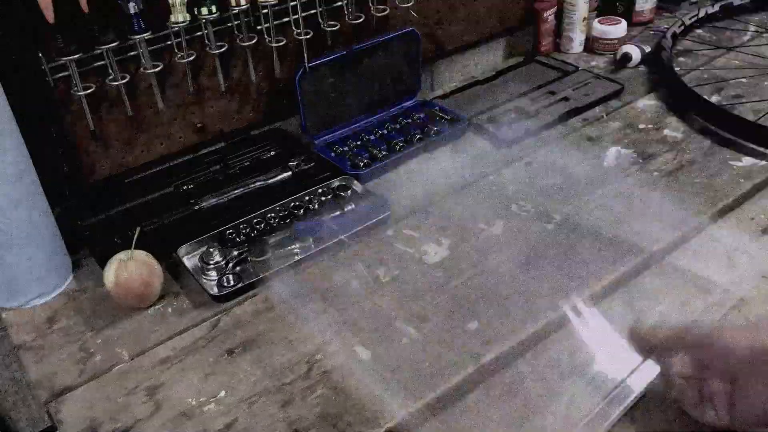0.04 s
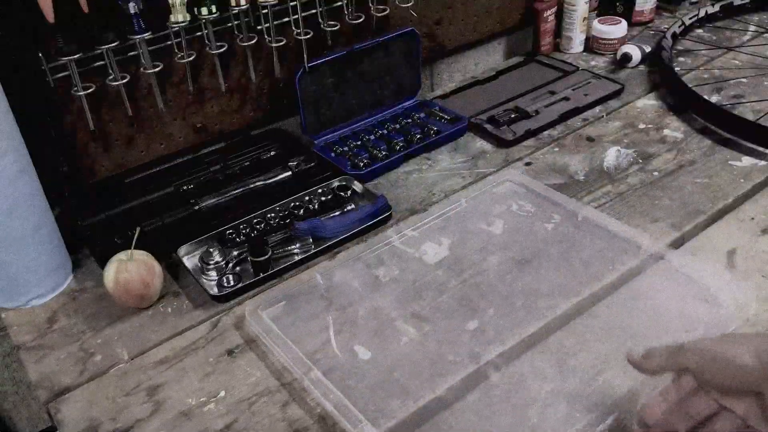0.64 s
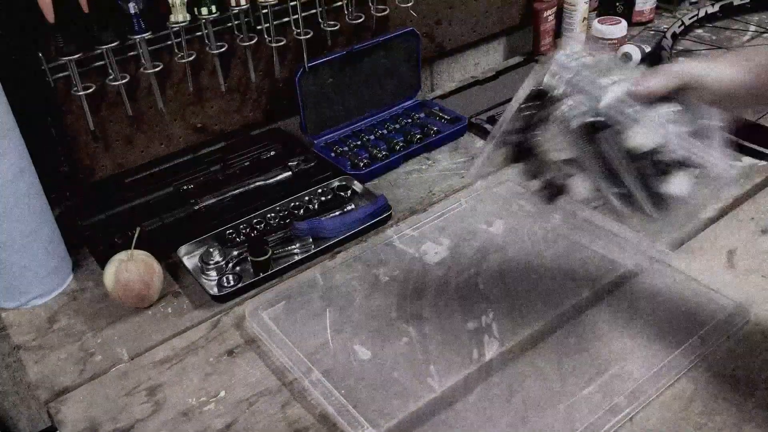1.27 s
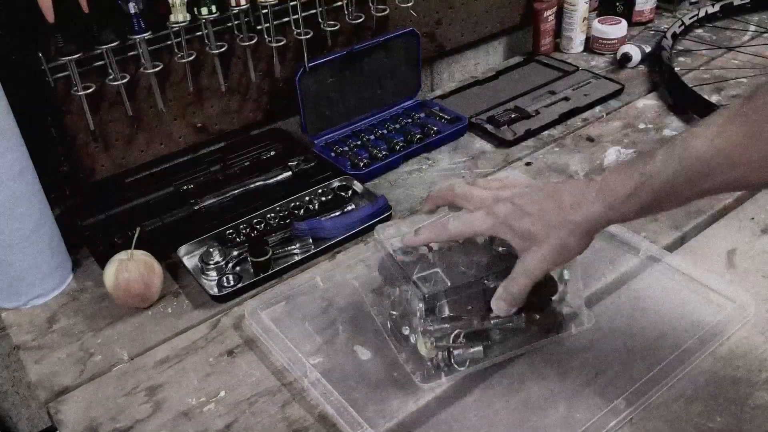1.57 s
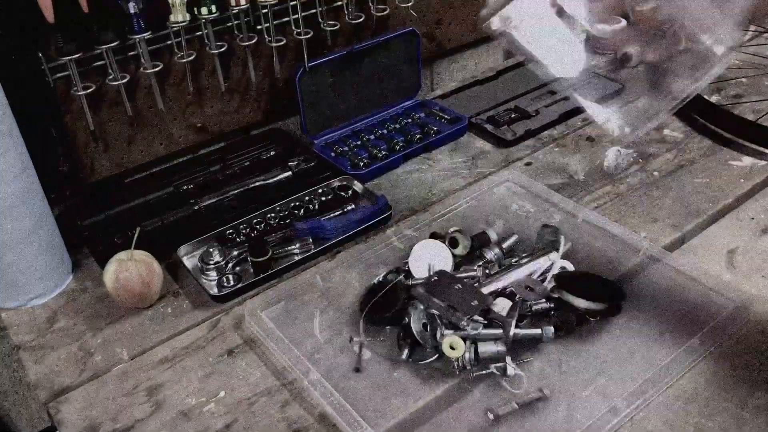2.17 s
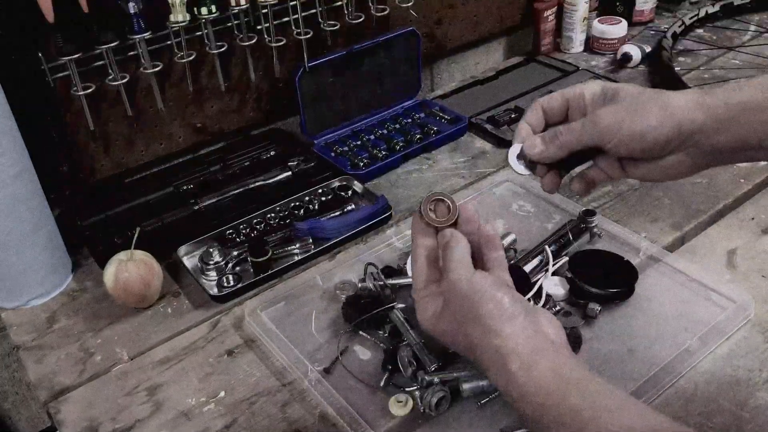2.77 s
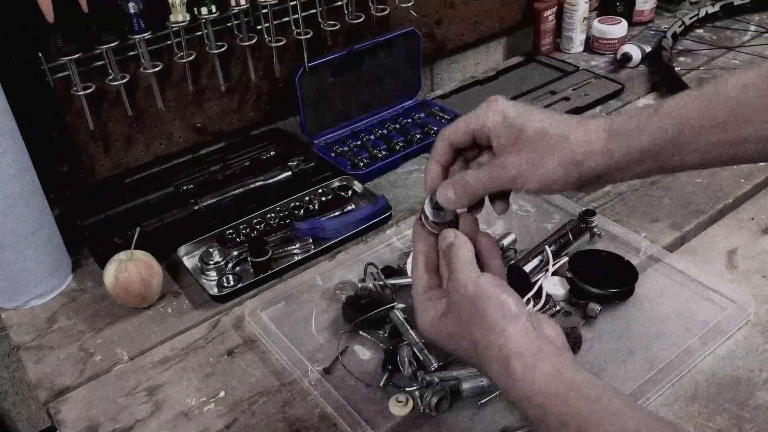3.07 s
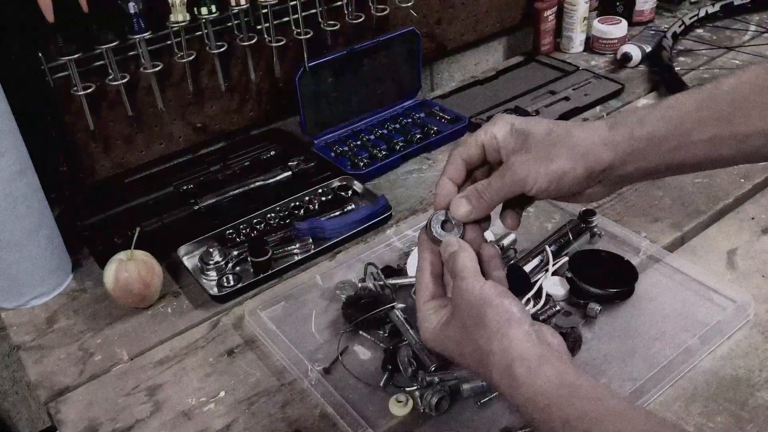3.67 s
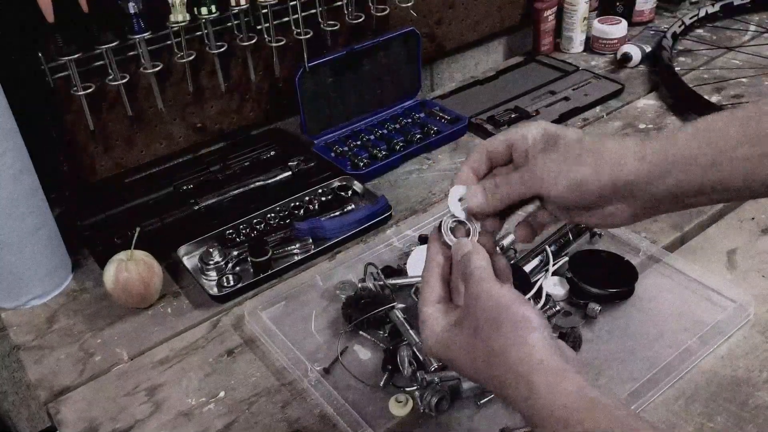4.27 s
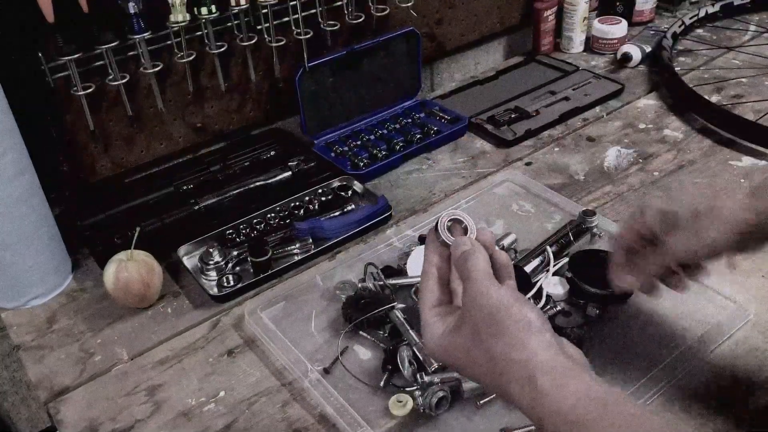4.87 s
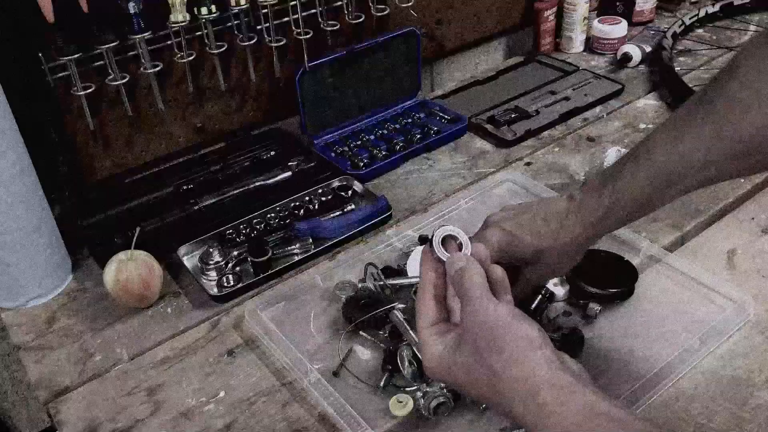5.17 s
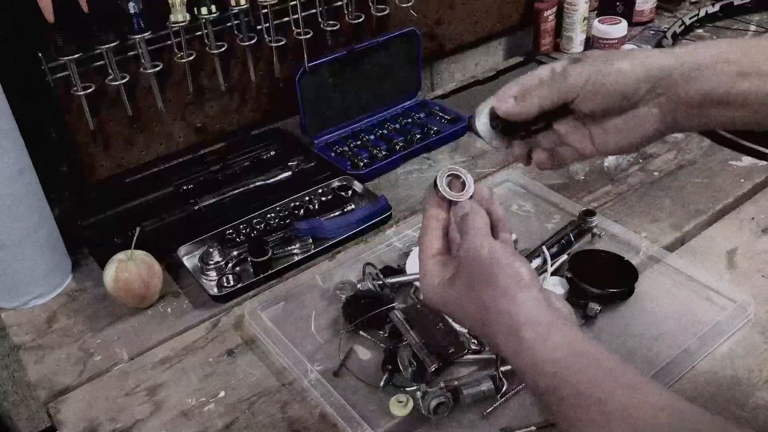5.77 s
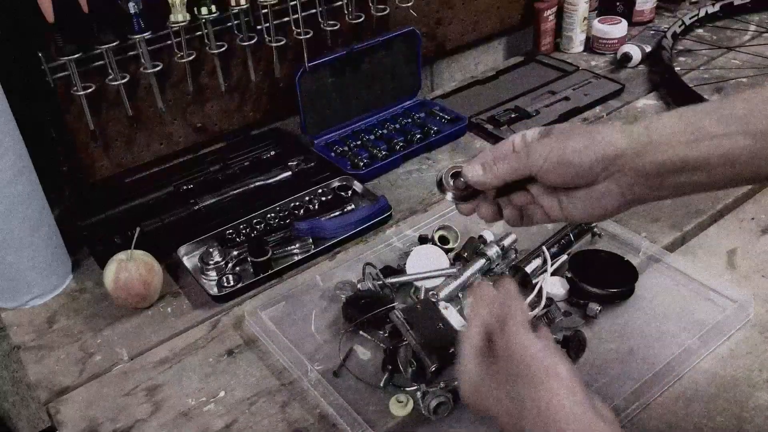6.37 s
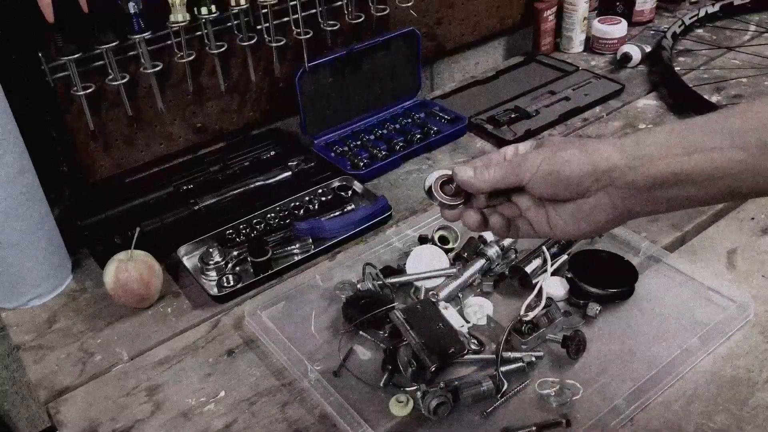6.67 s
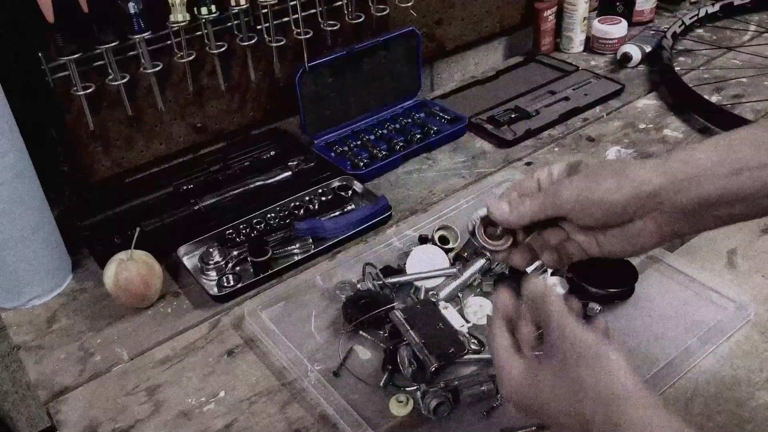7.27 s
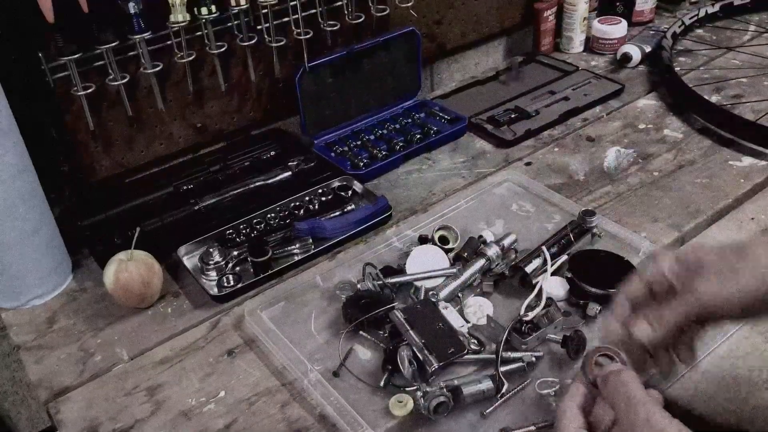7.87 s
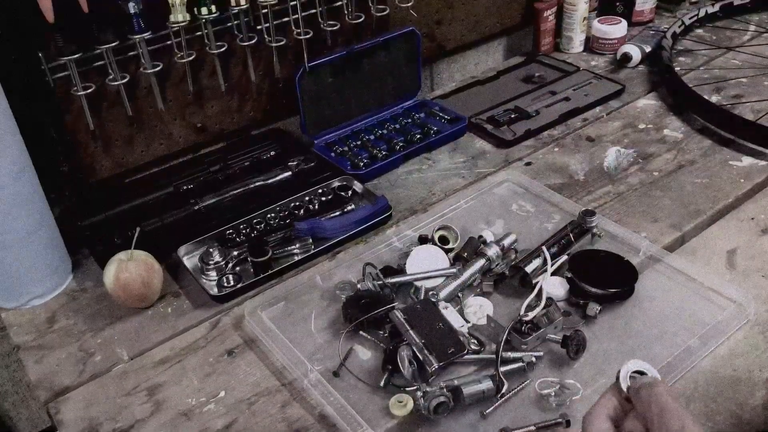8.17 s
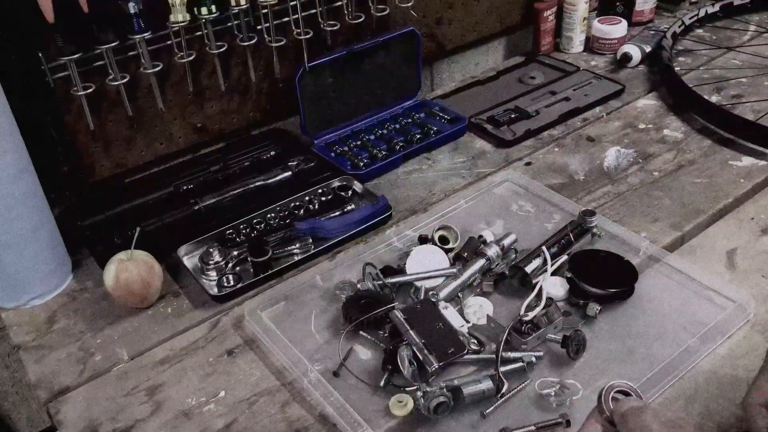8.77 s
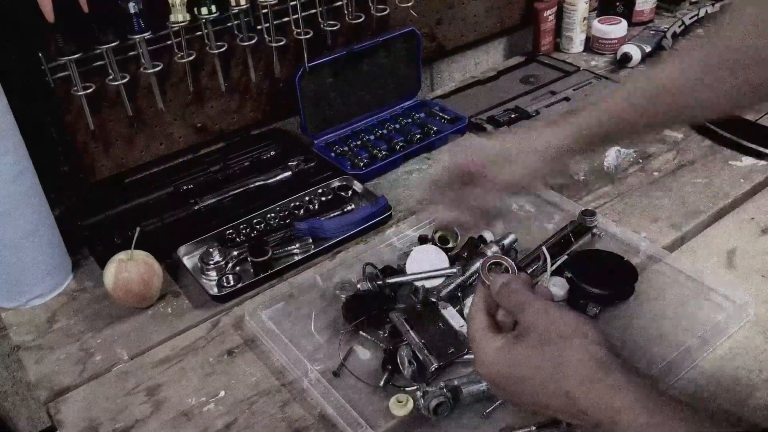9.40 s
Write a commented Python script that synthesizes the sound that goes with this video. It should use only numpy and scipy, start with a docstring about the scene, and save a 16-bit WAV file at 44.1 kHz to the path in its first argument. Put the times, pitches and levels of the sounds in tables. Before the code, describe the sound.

A plastic lid slaps onto a wooden workbench. A box of small metal parts rattles, bangs down hard, and spills its load, which drums and jingles on the plastic. After a pause, hands rummage through the heap with light clinks and scrapes. A washer drops with a sharp clack and rolls away with a faint wobble. The sounds are close, in a small workshop with a short echo and a low hum.

```python
"""A small workshop with a low hum; the room answers every knock.
A plastic lid is slapped onto a wooden bench; a box of small metal parts is banged upside down on it
and lifted off. The parts pour out, drumming on the plastic and clinking in their own modes.
Hands pick washers from the heap, try them together and drop one, which rolls away wobbling."""
import sys
import numpy as np
from scipy import signal
from scipy.fft import rfft
from scipy.io import wavfile

SR = 44100
rng = np.random.default_rng(int(sys.argv[2]) if len(sys.argv) > 2 else 0)


def to_wav(sig):
    """Store sig (one row per channel, or 1-D mono) as 16-bit WAV at the path in sys.argv[1].

    Samples outside -1..1 are clipped; the rate is SR.
    """
    pcm = np.clip(np.atleast_2d(sig), -1, 1) * 32767
    pcm = np.round(pcm).astype(np.int16)
    wavfile.write(sys.argv[1], SR, pcm.T)  # frames by channels


N = 416304
TIME = np.arange(N) / SR
TAPS, EDGE_HZ = 8192, 16200
PICKUP_S, LAND_S, LIFT_S, POUR_END_S = 1.02, 1.425, 1.945, 2.59

BANDS_HZ = [(150, 1200), (1200, 5000), (5000, 16000)]  # thud, clack, tick: low/Hz, high/Hz
# plastic resonances: f/Hz, width/Hz, level/dB
LANDED_BOX = [(287, 15, -11), (480, 7.7, -3.5), (607, 260, -5), (895.6, 84.8, -5.5), (1200, 56, -12),
              (1710, 73, -4), (2211, 220, -11.5)]
LOADED_LID = [(400, 31, -16.5), (689, 61, -8), (1715, 110, 1.5), (2890, 30, -10), (3490, 54.16, -9),
              (3870, 33, -8), (4752, 126, -7)]
# spectra: f/Hz, level/dB
BOX_TONE = [(35, -45.5), (60, -17), (130, -13), (250, -6.5), (281, -7.5), (315, -8.5), (448, -4), (515, -3),
            (651, -1), (1440, -10.5), (1620, -9.5), (3120, -10), (5330, -19.5), (13900, -24.5),
            (16000, -32.5)]
HEAP_TONE = [(59, -17), (100, -12.5), (277, -14), (335, -15.5), (433, -10), (991, -10.5), (1680, -0.5),
             (2990, 2), (5420, -10), (8830, -13), (10500, -16.5), (12700, -15), (16000, -22)]
RUB_TONE = [(88, -2), (150, -25), (359, -23), (443, -23.5), (623, -6), (1740, -9), (3440, -9.5),
            (6070, -17.5), (14000, -38)]


def amp(db):
    """dB to gain."""
    return 10 ** (np.asarray(db) / 20)


def unit(x):
    """Scale to rms 1."""
    return x / np.sqrt(np.mean(x ** 2) + 1e-20)


def read(points, hz):
    """Interpolate over log frequency."""
    f, value = np.transpose(points)
    return np.interp(np.log(hz + 1), np.log(f + 1), value)


def add(mix, start_s, sound):
    """Mix in place."""
    part = mix[max(round(start_s * SR), 0):][:len(sound)]
    part += sound[:len(part)]


def band(x, low_hz, high_hz):
    """Butterworth band-pass."""
    return signal.sosfilt(signal.butter(4, [low_hz, high_hz], "band", fs=SR, output="sos"), x)


def colour(x, tone):
    """Minimum-phase filter: attacks stay sharp."""
    hz = abs(np.fft.fftfreq(TAPS, 1 / SR))
    log_gain = np.log(amp(np.maximum(read(tone, hz), -100)))
    response = np.fft.ifft(np.exp(np.conj(signal.hilbert(log_gain)))).real
    return signal.oaconvolve(x, response[:TAPS // 2])[:len(x)]


def resonate(x, modes):
    """Parallel resonators."""
    return sum(amp(db) * signal.lfilter(*signal.iirpeak(hz, hz / width_hz, SR), x)
               for hz, width_hz, db in modes)


def ring(modes, size=SR):
    """Sum of decaying sines."""
    t = np.arange(size) / SR
    return sum(amp(db - 60 * t / t60_s) * np.sin(2 * np.pi * hz * t) for hz, db, t60_s in modes)


def grains(per_s, spread_db):
    """Random impulses, most weak, a few strong."""
    size = amp(spread_db * np.minimum(rng.exponential(1, N), 4))
    return size * rng.choice([-1, 1], N) * (rng.random(N) < per_s / SR)


def air():
    """Faint steady noise, mostly bass."""
    tone = [(12, -29.5), (20, -1), (39, -1), (75, -17), (96, -3.5), (120, -8), (157, -9.5), (185, -20),
            (326, -28.5), (464, -20), (561, -29), (755, -30), (1530, -39.5), (10200, -46.5), (13000, -51)]  # spectrum: f/Hz, level/dB
    noise = band(colour(rng.standard_normal(N), tone), 10, 13500)
    return amp(-77) * noise / band(noise, 200, 13000).std()


def hum():
    """Low wavering hum; its pitch and level step."""
    steps = [(0, 60.1, -60.5), (1.011, 98.84, -67.5), (2.6, 122.1, -67), (9.019, 115, -71.5)]  # t/s, f/Hz, level/dB
    start_s, hz, db = np.transpose(steps)
    step = np.searchsorted(start_s[1:], TIME)
    lowpass = signal.butter(2, 14, fs=SR, output="sos")
    waver = unit(signal.sosfilt(lowpass, rng.standard_normal((2, N))))
    carrier = np.exp(2j * np.pi * np.cumsum(hz[step]) / SR)
    return amp(db - 1)[step] * (carrier * (waver[0] + 1j * waver[1])).real


def workshop(x, onset_s):
    """Diffuse echo of a small room; treble dies first."""
    decay = [(150, .42), (400, 0.33), (1040, 0.31), (2760, 0.28), (7280, 0.18), (15000, 0.25)]  # f/Hz, t60/s
    hz, t, spectrum = signal.stft(rng.standard_normal(SR // 2), SR, nperseg=256)
    spectrum *= amp(-60 * t / read(decay, hz)[:, None])
    tail = signal.istft(spectrum, SR, nperseg=256)[1]
    tail *= 1 - np.exp(-(np.arange(len(tail)) / SR / onset_s) ** 2)
    tone = [(100, 2.5), (700, 0.5), (2500, -3), (7000, -4.5), (15000, -3.5)]  # f/Hz, level/dB
    tail = colour(tail / np.linalg.norm(tail), tone)
    return signal.oaconvolve(x, tail)[:N]


def rolling_washer():
    """A washer rolls, swishing at each wobble, faster as it leans over; things on the bench ring."""
    path = [(8.03, -70, 16), (8.3, -73, 14.4), (8.6, -74, 20), (8.8, -74, 23.9), (8.99, -71, 30)]  # t/s, level/dB, wobble rate/Hz
    # two low tones ringing from things on the bench, two for the swish: f/Hz, width/Hz, level/dB
    modes = [(734.5, 35, 3), (1106, 46, -4), (2810, 150, -1), (5140, 970, -19)]
    s, db, wobble_hz = np.transpose(path)
    turns = np.cumsum(np.interp(TIME, s, wobble_hz) * (TIME > s[0])) / SR
    wobble = np.cos(np.pi * turns) ** 2
    bench_ring = unit(resonate(rng.standard_normal(N), modes[:2]))
    swish = resonate(rng.standard_normal(N), modes[2:])
    swish = unit(swish + amp(-1) * colour(rng.standard_normal(N), RUB_TONE))
    gain = amp(np.interp(TIME, s, db)) * (TIME >= s[0]) * (TIME <= s[-1])
    return gain * (bench_ring * (0.5 + 0.32 * wobble) + amp(-5) * swish * wobble ** 2)


def rubs(attack_s=0.0058, t60_s=0.18):
    """Fingers and parts slide: strokes of tiny crackling slips."""
    strokes = [(0.093, .007, -56.5), (0.272, 0.16, -71), (0.447, .025, -66), (0.5, 0.012, -64.5),
               (3.729, .1, -83), (4.735, 0.22, -62), (5.002, .008, -63), (5.235, 0.028, -60),
               (5.294, 0.018, -61), (8.594, 0.014, -72.5), (9.075, .02, -74.5), (9.135, 0.028, -72),
               (9.3, 0.078, -81.5)]  # t/s, length/s, level/dB
    slips = unit(colour(grains(per_s=5800, spread_db=0.5), RUB_TONE))
    pressure, t = np.zeros(N), np.arange(SR) / SR
    for s, length_s, db in strokes:
        release_db = -60 * np.maximum(t - length_s, 0) / t60_s
        add(pressure, s, amp(db + release_db) * np.minimum(t / attack_s, 1))
    return amp(3.5) * slips * pressure


def ringing():
    """Free parts chime; the two big blows shake the bench and what lies on it."""
    strikes = [(1.089, -44.5, "box"), (1.201, -50.5, "box"), (1.225, -49, "box"), (2.122, -27.5, "sleeve"),
               (2.174, -28, "sleeve"), (2.263, -23.5, "sleeve"), (5.196, -47, "nut"), (5.224, -48, "bolt"),
               (5.234, -39.5, "bolt"), (5.353, -71, "tool case"), (5.375, -23.5, "bush"),
               (5.896, -27.5, "washer"), (7.44, -51, "washer"), (7.828, -34.5, "ring"),
               (7.902, -59, "tool case")]  # t/s, level/dB, part
    # modes: f/Hz, level/dB, t60/s
    part_modes = {"box": [(711, -4, .12), (920, 1.5, 0.11), (1120, -7, .1), (1370, -8.5, .1)],
                  "sleeve": [(7520, -0.5, 0.096), (8710, 1, .1), (12889, -7.5, 0.12), (12960, -3.5, .11)],
                  "nut": [(7770, 7.5, 0.059), (12400, -19, .06)], "bolt": [(4160, 0, 0.068),
                  (4340, 4, 0.045), (4700, 0, .08), (4823, -7, 0.088), (8000, -10.5, .1), (13100, -17, .1),
                  (15500, -5, 0.084)], "bush": [(5100, -25, 0.093), (8690, -2, 0.083),
                  (13700, -26.5, 0.11)], "washer": [(8650, -14.5, 0.077), (11930, -7, 0.019),
                  (13500, -19, .11), (13600, -6, 0.04)], "ring": [(8900, -14, 0.36), (13960, 0.5, .46)],
                  "tool case": [(1130, -1, 1.1), (1750, -11.5, .9), (2473, -18.5, 1.1)]}
    clutter_modes = [(70.15, 5, 0.25), (307, -13, 1.2), (608, -4, 1.6), (660, -4, 0.77), (760, -11, 3.1),
                     (824, -4.5, 1.2)]
    bench_modes = [(44.5, -7, 0.82), (174, -0.5, 0.29), (224, 1, .25), (283, -5, 0.12), (458.3, 7.5, 0.14),
                   (534, -8.5, 1.7), (560, 6, .2), (656, 11.5, .18), (893.5, 10, .2), (932, 7.5, 0.18)]
    out = np.zeros(N)
    for s, db, part in strikes:
        add(out, s, amp(db) * ring(part_modes[part]))
    add(out, 0.127, amp(-48) * ring(clutter_modes))
    add(out, 1.448, amp(-31) * ring(bench_modes))
    return out


def loose_part(t60_s, detune):
    """One metal part: three modes of the heap, randomly detuned and damped."""
    heap_modes = [(5787, -64), (6169, -64), (6756, -59), (7370, -53.5), (7671, -50), (7854, -59),
                  (8290, -59), (8710, -46.5), (9017, -58), (9458, -59.5), (9932, -58), (9991, -56),
                  (11100, -50.5), (12252, -54), (12888, -51.5), (13173, -48), (13631, -62), (14067, -63.5),
                  (15455, -57.5), (15558, -61)]  # f/Hz, level/dB
    picks = rng.permutation(heap_modes)[:3]
    modes = [(hz * (1 + detune * rng.standard_normal()), db, t60_s * np.exp(rng.normal(0, 0.092)))
             for hz, db in picks]
    sound = ring(modes, size=TAPS // 2)
    return np.pad(sound, (0, TAPS // 2)) / abs(sound).max()


def plastic_body(x, modes, loss_hz=70):
    """Thin lossy plastic: widened resonances, capped at 0 dB, add a hollow colour."""
    return x + resonate(x, [(hz, width_hz + loss_hz, min(db, 0)) for hz, width_hz, db in modes])


def blows(hits, tone, modes, snap_db, crack_s, body_db, body_t60_s, metal_db, echo_db):
    """Each blow: a snap with near echoes, a brief crack, dense plastic ring, a metal part's modes."""
    echoes = [(.0012, -5), (.0028, -4), (.0047, -6)]  # off bench and tool cases: delay/s, level/dB
    out, t, hz = np.zeros(N), np.arange(TAPS) / SR, np.fft.rfftfreq(TAPS, 1 / SR)
    envelope = np.exp(-t / crack_s) + amp(body_db - 60 * t / body_t60_s)
    attack = round(0.02 * SR)
    for s, clack_db, thud_db, tick_db in hits:
        hit = envelope * rng.standard_normal(TAPS)
        hit += amp(metal_db) * loose_part(t60_s=0.029, detune=0.013)
        hit[0] += amp(snap_db)
        for delay_s, db in echoes:
            add(hit, delay_s * rng.uniform(0.93, 1.15), amp([snap_db + echo_db + db]))
        hit = colour(plastic_body(hit, modes), tone)
        # force and point of impact set the band balance
        power = 2 * abs(rfft(hit[:attack], TAPS)) ** 2 / (TAPS * attack)
        band_db = 10 * np.log10([power[(hz > low) & (hz < high)].sum() for low, high in BANDS_HZ])
        thud, clack, tick = np.array([thud_db, 0, tick_db]) - band_db
        balance = [(900, thud), (1600, clack), (3800, clack), (6800, tick)]
        add(out, s, amp(clack_db) * colour(hit, balance))
    return out


def washer_clicks():
    """Single washers click together or land near the lid's rim."""
    hits = [(3.095, -72.5, -14, -2), (3.117, -83, -8, 16), (4.792, -53, -27, -17), (4.817, -55, -29.5, -12),
            (4.858, -54, -28, -11.5), (5.149, -65, -13, -11), (5.375, -50.5, -6, -3),
            (5.896, -62, -12, 9.5), (6.465, -85.5, -1, 7), (7.437, -78.5, -9, 6.5), (7.722, -76.5, -6, 1),
            (7.823, -56, -4.5, 10.5), (7.901, -24.5, -13, 2), (7.946, -40, -15.5, 2.5),
            (8.004, -56, -6, -1), (8.138, -84, 13, 13)]  # t/s, clack/dB, thud/dB re clack, tick/dB re clack
    tone = [(59, -34), (100, -1.5), (202, -31.5), (277, -5), (350, -10), (736, -3), (880, -5), (1080, -4.5),
            (1750, -11), (2270, -10), (2470, -7), (3470, -6), (4770, 0), (8830, -1), (14100, -3.5),
            (16000, -11.5)]  # f/Hz, level/dB
    edge_modes = [(1044, 120, 1.5), (1432, 32, -4.5), (2025, 51, 1), (2550, 16, -9), (3600, 36, -8)]  # f/Hz, width/Hz, level/dB
    return blows(hits, tone, edge_modes, snap_db=19, crack_s=0.001586,
                 body_db=-4, body_t60_s=0.063, metal_db=-27, echo_db=-3)


def heap_clinks():
    """Metal parts knock on the heap and the loaded lid."""
    hits = [(1.951, -53.5, 9, -5.5), (1.988, -39, -14, -14), (2.027, -38.5, -8.5, -28),
            (2.068, -34.5, -4, 3), (2.112, -33.5, -8, -7), (2.122, -49, 5, 20), (2.173, -39, -1.5, 7),
            (2.264, -45, -4, 12), (2.351, -55.5, -12, 17), (2.388, -34, -13, -7.5),
            (2.54, -44.5, -13.5, -13), (2.569, -49, -15.5, -20), (4.621, -39, -5, -1),
            (4.666, -39.5, -7.5, -8.5), (4.682, -46, -7, -13), (4.717, -48, -7.5, -3),
            (5.011, -46, -8.5, -8), (5.174, -59.5, -2, -1), (5.183, -53, 0, -5), (5.196, -48.5, -4, -3),
            (5.224, -56, 0.5, 4.5), (5.305, -56.5, -15, -8), (5.342, -52, -14.5, -8),
            (5.353, -45, -7.5, 0.5), (5.363, -48.5, -4, -11)]  # t/s, clack/dB, thud/dB re clack, tick/dB re clack
    return blows(hits, HEAP_TONE, LOADED_LID, snap_db=8.5, crack_s=0.0013,
                 body_db=5, body_t60_s=0.099, metal_db=-13.5, echo_db=-5)


def lid_slaps():
    """Hollow knocks on the plastic lid, then a soft hand thump on the bench."""
    hits = [(0.084, -61.5, 18, -17), (0.12, -27.5, -7, -9.5), (0.127, -20, -8.5, -12.5),
            (0.153, -54, 1, -10), (0.201, -56, -5, -20), (0.211, -38.5, -6, -20), (0.716, -48, -3, -21),
            (0.724, -42, -5, -15), (0.775, -52.5, -6, -21), (7.847, -40, -10.5, -10.5),
            (7.852, -46.5, -7.5, -11.5), (9.157, -76.5, 11.5, -7), (9.23, -89.5, 15.5, -6.5)]  # t/s, clack/dB, thud/dB re clack, tick/dB re clack
    tone = [(18, -26), (30, -7.5), (124, -14.5), (252, -4.5), (404, -10.5), (473, -1), (1010, -4.5),
            (1400, -5.5), (2230, -4), (2680, -4.5), (4000, -7.5), (10500, -30.5), (16000, -47.5)]  # f/Hz, level/dB
    lid_modes = [(1020, 74, -10.5), (1334, 70, 0), (1497, 25, -1.5), (2030, 35, -11.5), (2237, 41, -4),
                 (2280, 33, -5), (3180, 140, -7.5), (4205, 35, -12), (5960, 69, -20.5)]  # f/Hz, width/Hz, level/dB
    return blows(hits, tone, lid_modes, snap_db=11, crack_s=0.0026,
                 body_db=-19.5, body_t60_s=0.11, metal_db=-56, echo_db=-3)


def box_bangs():
    """The full box and its load knock, hardest on landing."""
    hits = [(1.09, -58.5, 1.5, 2.5), (1.172, -63, -7, 5.5), (1.275, -46, -3.5, -9), (1.321, -50, -5, -9),
            (1.349, -47.5, -0.5, -4.5), (1.374, -46.5, 1, -2), (1.443, -22.5, 2.5, -20.5),
            (1.454, -21, 6, -10), (1.461, -14, -7, -13), (1.529, -38.5, 0, -5), (1.588, -34, -4, -13.5),
            (1.625, -33.5, -14, -14), (1.712, -46, -9.5, -21), (1.762, -43.5, -5.5, -14.5)]  # t/s, clack/dB, thud/dB re clack, tick/dB re clack
    return blows(hits, BOX_TONE, LANDED_BOX, snap_db=12.5, crack_s=0.0016,
                 body_db=-7.5, body_t60_s=0.14, metal_db=-20, echo_db=-3.5)


def contacts(per_s, spread_db, scrape_s=0.0015):
    """Parts hit plastic at random: each a click and a brief scrape."""
    clicks = unit(grains(per_s, spread_db))
    energy = signal.lfilter([1], [1, -np.exp(-1 / (scrape_s * SR))], clicks ** 2)
    scrape = unit(np.sqrt(energy) * rng.standard_normal(N))
    return unit(scrape + amp(-6.5) * clicks)


def jingle(t60_s, detune, count):
    """Parts hit each other at random, each with its own pitches."""
    out = np.zeros(N)
    for slot in range(count):
        s = np.interp(slot + rng.random(), [0, count], [PICKUP_S, POUR_END_S])
        add(out, s, amp(rng.normal(0, 3.5)) * loose_part(t60_s, detune))
    return out / out[(TIME > PICKUP_S) & (TIME < POUR_END_S)].std()


def flow_gains(t):
    """Gain per band as the load slides, crashes, settles, pours and topples; surges add in power."""
    # peak t/s, rise/s, hold/s, t60/s, clack/dB, thud/dB re clack, tick/dB re clack
    surges = [(1.098, 0.11, .004, 0.22, -52, 2.5, -4.5), (1.197, .05, 0.032, 0.15, -52, 0.5, 1.5),
              (1.275, 0.023, 0.0026, .17, -46.5, 3.5, -8), (1.384, .13, 0.052, .2, -42, 3, 0),
              (1.442, .033, .018, 0.37, -14, -2.5, -6), (1.633, .1, 0.1, 0.49, -37.5, -2, -10.5),
              (2.061, 0.11, 0.22, 0.6, -28, -9, -2.5), (2.561, 0.25, 0.0087, .15, -47.5, -5, -30)]
    slopes = [0.83, 0.95, 1.25]  # thud, clack, tick in dB per dB of flow: slow parts sound dull
    power = 0
    for peak_s, rise_s, hold_s, t60_s, clack_db, thud_db, tick_db in surges:
        rise_db = -30 * np.maximum(peak_s - t, 0) / rise_s
        fade_db = -60 * np.maximum(t - peak_s - hold_s, 0) / t60_s
        peak_db = clack_db + np.array([[thud_db], [0], [tick_db]])
        power += amp(peak_db + np.outer(slopes, rise_db + fade_db)) ** 2
    return np.sqrt(power)


def tumble():
    """Hundreds of collisions drum on the carried box, the landed box, then the lid."""
    held_modes = [(730, 67, -2), (950, 46, 0), (1370, 46, -3), (2440, 60, -9.5), (3610, 140, -8.5)]  # box in the air: f/Hz, width/Hz, level/dB
    active = (TIME > PICKUP_S) & (TIME < POUR_END_S)
    caged = contacts(per_s=800, spread_db=4.5) + amp(-5) * jingle(t60_s=0.08, detune=0.21, count=170)
    free = contacts(per_s=1800, spread_db=3.5) + amp(1) * jingle(t60_s=0.057, detune=0.004, count=260)
    carried = colour(plastic_body(caged[active], held_modes), BOX_TONE)
    carried = band(carried, 520, EDGE_HZ)  # no bass off the bench
    landed = colour(plastic_body(caged[active], LANDED_BOX), BOX_TONE)
    poured = colour(plastic_body(free[active], LOADED_LID), HEAP_TONE)
    stage = np.searchsorted([LAND_S, LIFT_S], TIME[active])
    out = np.zeros(N)
    for edges_hz, gain in zip(BANDS_HZ, flow_gains(TIME[active])):
        sounds = band(np.array([carried, landed, poured]), *edges_hz)
        out[active] += gain * np.choose(stage, sounds / sounds.std(axis=1, keepdims=True))
    return amp(-5.5) * out


def scene():
    """Mono mix in the room; all but air and hum stops dead briefly after the pour."""
    lid, box, heap, washers = lid_slaps(), box_bangs(), heap_clinks(), washer_clicks()
    clatter, chimes = tumble() + rubs(), ringing()
    knock_send = amp(-1.5) * lid + amp(-5.5) * (box + washers) + amp(-9.5) * heap
    echo = workshop(knock_send + amp(-7.5) * clatter + amp(-21) * chimes, onset_s=0.002)
    direct = lid + box + heap + washers + clatter + chimes + rolling_washer()
    gate = np.interp(TIME - POUR_END_S, [-0.002, 0, 0.4, 0.45], [1, 0, 0, 1])
    return ((direct + echo) * gate + air() + hum())[None]


def record(dry):
    """Soft clip, then low-pass."""
    ceiling = 0.6
    clipped = dry / (1 + (dry / ceiling) ** 6) ** (1 / 6)
    lowpass = signal.firwin(255, EDGE_HZ, window=("kaiser", 9), fs=SR)
    return signal.oaconvolve(clipped, lowpass[None], "same")


dry = scene()
out = record(dry)
to_wav(out)
```